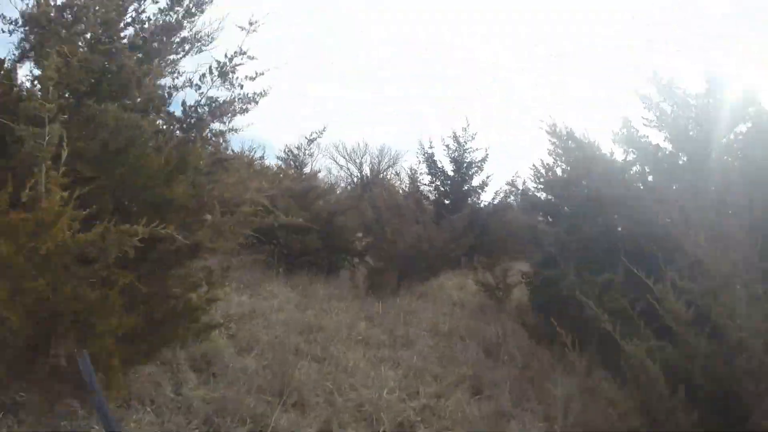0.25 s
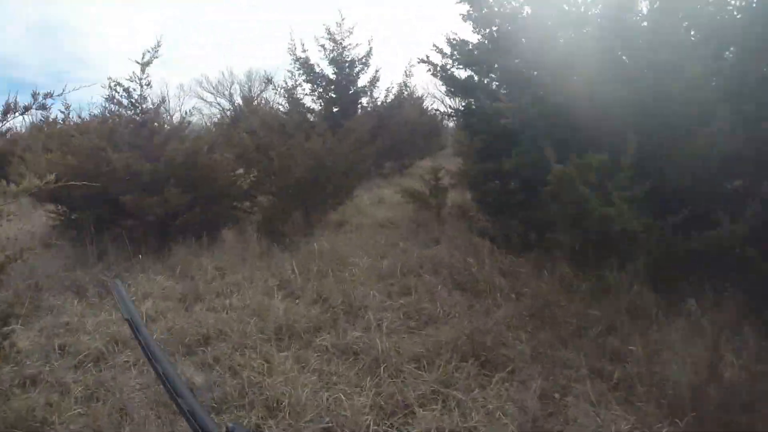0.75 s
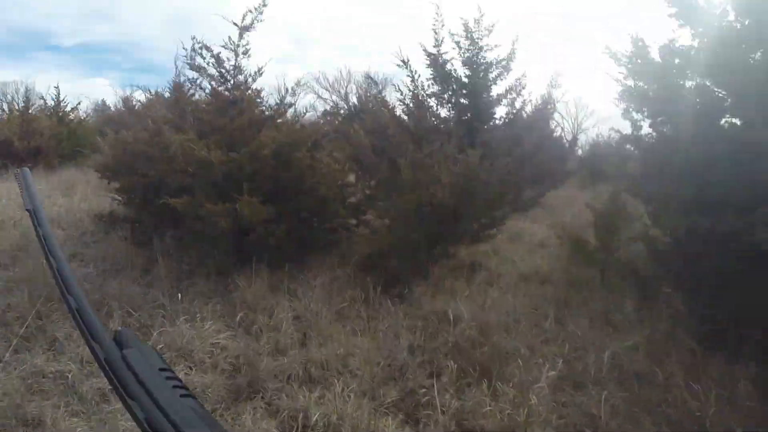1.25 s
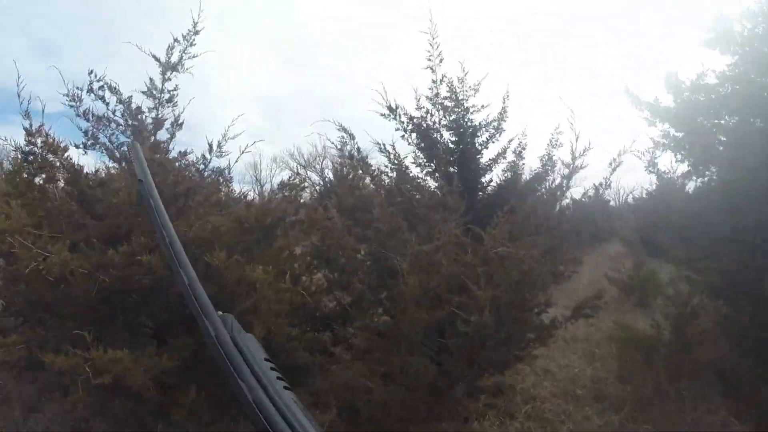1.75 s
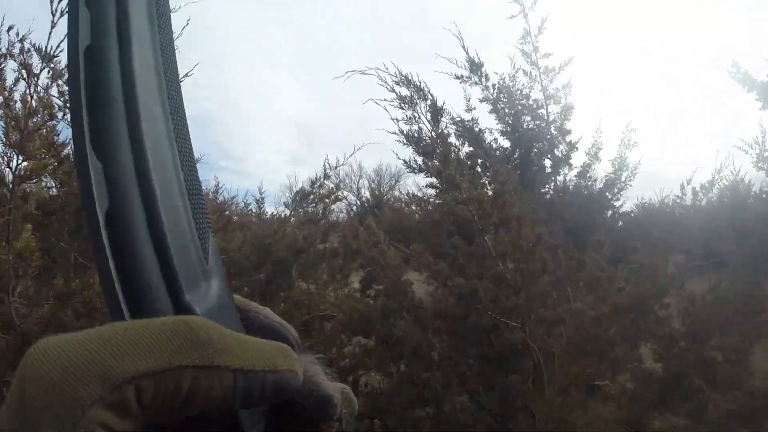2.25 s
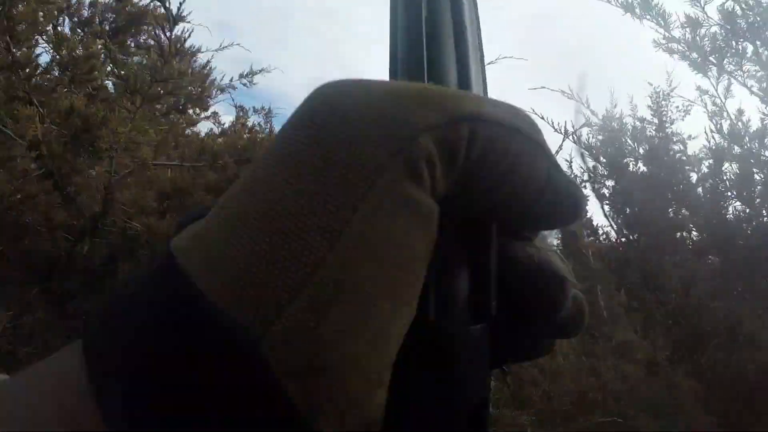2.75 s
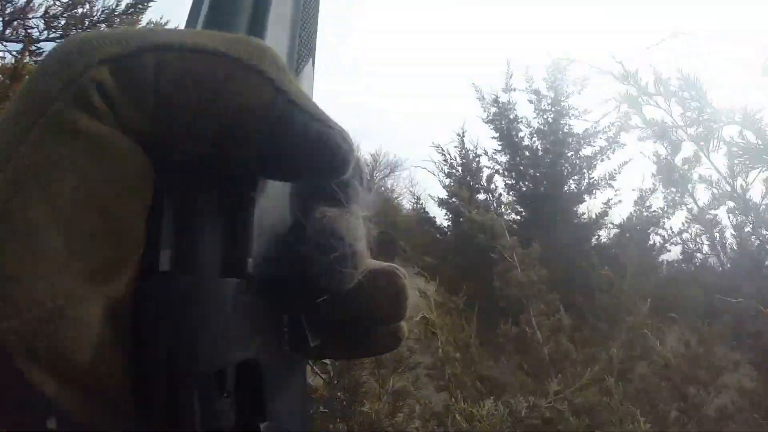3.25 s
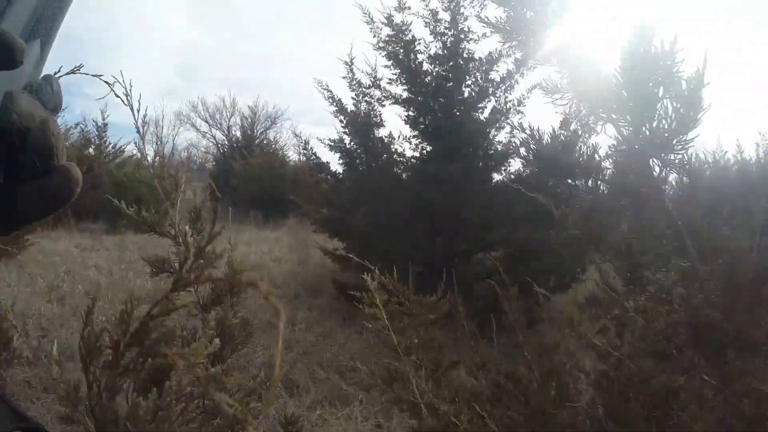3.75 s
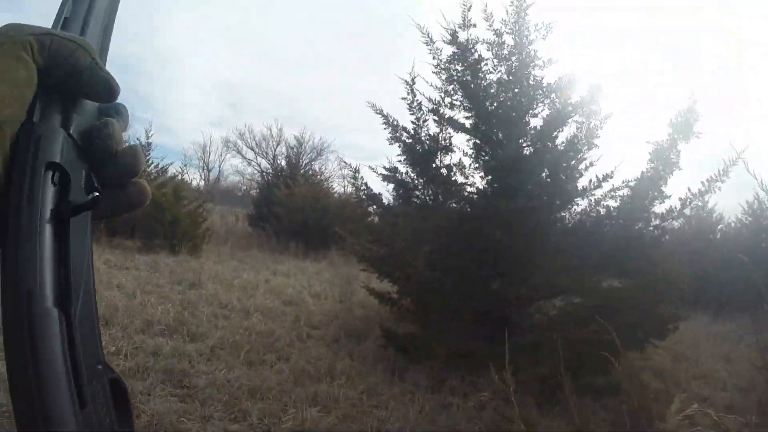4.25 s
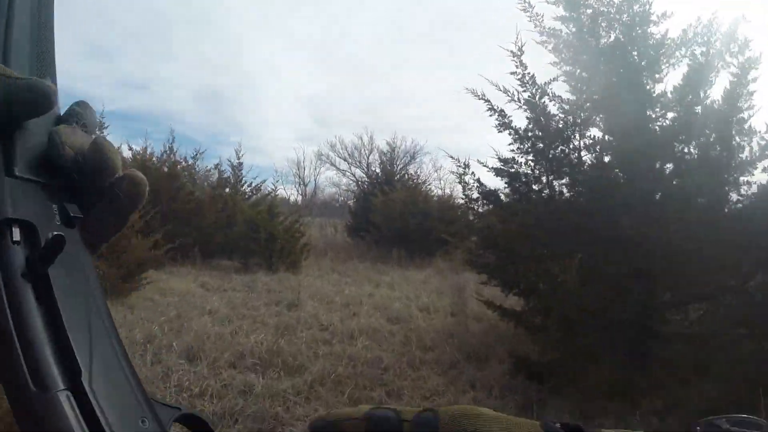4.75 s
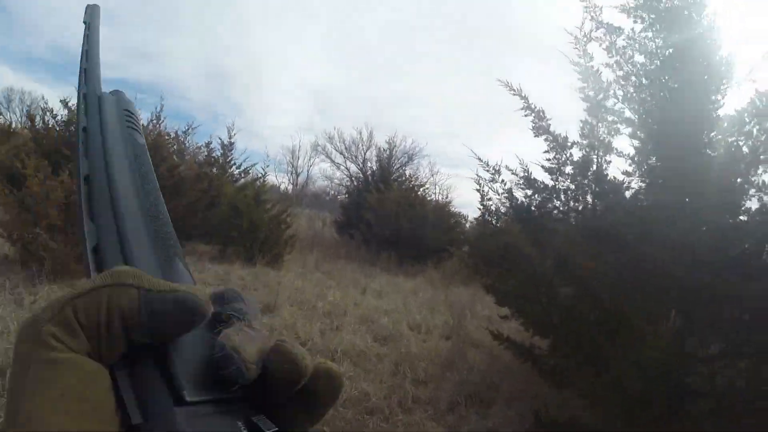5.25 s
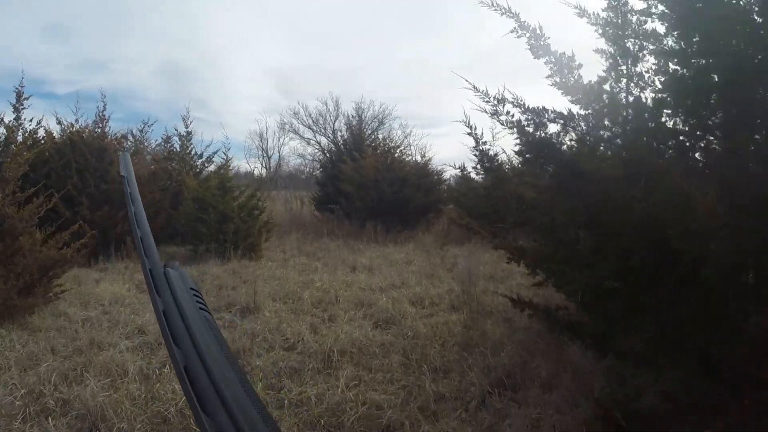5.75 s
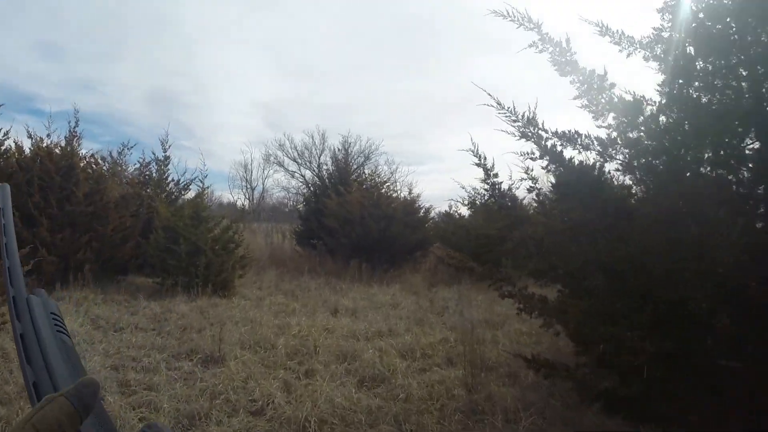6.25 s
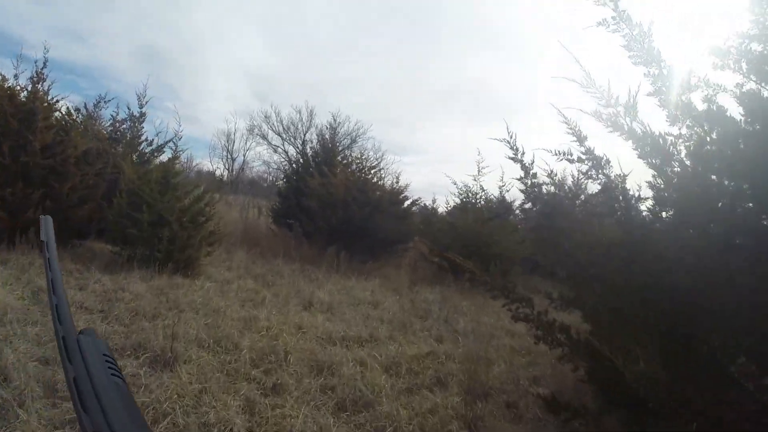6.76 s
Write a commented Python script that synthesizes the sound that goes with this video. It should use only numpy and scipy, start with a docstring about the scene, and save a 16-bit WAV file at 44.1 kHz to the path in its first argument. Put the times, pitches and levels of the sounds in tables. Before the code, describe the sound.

Low thumps, rumble and hollow clacks come with crunching footsteps in dry outdoor grass, picked up by a microphone inside a closed case worn on the body. The steps ease as evergreen boughs brush past and twigs crack. A metal fitting on a carried gun clinks sharply, then again a second later, with a short ring. Quiet, careful steps and light rustling follow over a faint hiss.

```python
"""Low jolts and hollow knocks over crunching dry grass and swishing cedar, heard through a closed case.
A walker with a long gun and a body-worn camera pushes through: steps jolt the mount, gear taps the case,
stalks snap and needles slide along clothing. Two sharp metal clinks from the gun's fittings make the
camera duck its gain, then the walk goes on softly."""
import sys
import numpy as np
from scipy import signal
from scipy.fft import rfft, irfft, next_fast_len
from scipy.io import wavfile

SR = 44100
rng = np.random.default_rng(int(sys.argv[2]) if len(sys.argv) > 2 else 0)


def put_to_file(sound):
    """Save the sound as 16-bit audio at rate SR, in the file named by the first command-line argument."""
    columns = np.atleast_2d(sound).T  # one column per channel
    safe = np.clip(columns, -1, 1)
    whole_steps = np.round(safe * 32767)
    wavfile.write(sys.argv[1], SR, whole_steps.astype(np.int16))


N = 309582
T = np.arange(N) / SR

# spectrum of stalk crunch and cloth drag: freq_hz, relative_db
CRUNCH_SPECTRUM = [(130, -25), (250, 3), (450, 1.5), (800, -6.5), (1350, -6), (2100, -11), (3200, -22),
                   (7000, -63.5)]
# long modes of the gun's fitting, first set: pitch_hz, relative_db, t60_s
FITTING_MODES = [(1814, 0, .245), (2902, -12, 0.11), (3138, -10, 0.083)]


def from_db(db):
    return 10 ** (np.asarray(db) / 20)


def unit_rms(x):
    return x / np.sqrt(np.mean(x ** 2) + 1e-20)


def power_sum(*gains):
    return np.sqrt(sum(gain ** 2 for gain in gains))


def at_hz(points, hz):
    """Interpolate a spectrum over log frequency."""
    known_hz, values = np.transpose(points)
    return np.interp(np.log(hz + 1e-3), np.log(known_hz), values)


def add(out, start_s, sound):
    start = max(round(start_s * SR), 0)
    out[start:start + len(sound)] += sound[:N - start]


def drift(rate_hz):
    """Slow random curve, rms 1."""
    hz = np.fft.rfftfreq(N, 1 / SR)
    return unit_rms(irfft(rfft(rng.standard_normal(N)) / (1 + (hz / rate_hz) ** 2), N))


def swell(middle_s, length_s):
    """Gaussian rise and fall, height 1."""
    return np.exp(-np.minimum(2 * ((T - middle_s) / length_s) ** 2, 50))


def coloured(x, spectrum):
    """Filter by a smooth spectrum; rms 1."""
    size = next_fast_len(N + SR // 10)
    gain = from_db(at_hz(spectrum, np.fft.rfftfreq(size, 1 / SR)))
    return unit_rms(irfft(rfft(x, size) * gain, size)[:N])


def ring(force, hz, t60_s):
    """One mode: a unit click starts a decaying sine of height 1."""
    radius, angle = from_db(-60 / (t60_s * SR)), 2 * np.pi * hz / SR
    return signal.lfilter([0, np.sin(angle)], [1, -2 * radius * np.cos(angle), radius ** 2], force + 1e-18)


def contact(t, chatter_s, chatter_gain):
    """Force of a touch and its dying chatter, rounded by the give of the surfaces."""
    force = rng.standard_normal(len(t)) * np.exp(-t / chatter_s)
    force = chatter_gain * force / np.linalg.norm(force)
    force[0] += 1
    return signal.sosfilt(signal.butter(2, 10500, fs=SR, output="sos"), force)


def struck(modes, force, hardness, detune):
    """A contact rings every mode; hardness (freq_hz, gain_db) weights them."""
    out = 0
    for k, (hz, mode_db, t60_s) in enumerate(modes):
        mode = ring(force, hz * np.exp(detune * rng.standard_normal()), t60_s)
        out += (-1) ** k * from_db(mode_db + at_hz(hardness, hz)) * mode / np.abs(mode).max()
    return out


def through_case(x):
    """The closed case resonates in a few bands; rms 1."""
    # main resonances, then thin whistling ones: centre_hz, width_hz, lift_db
    case_peaks = [(584, 79, 14), (1040, 82, 11), (2270, 620, 9.5), (3800, 620, 13.5), (6220, 890, 10.5)]
    case_whistles = [(5050, 140, 9), (10020, 380, 7), (12680, 230, 10)]
    for centre_hz, width_hz, lift_db in case_peaks + case_whistles:
        band = signal.lfilter(*signal.iirpeak(centre_hz, centre_hz / width_hz, fs=SR), x)
        x = x + (from_db(lift_db) - 1) * band
    return unit_rms(x)


def mic_hiss():
    """Steady hiss of the microphone in its case."""
    # noise floor: freq_hz, relative_db
    hiss_spectrum = [(2800, -20), (4200, 2), (5100, -0.5), (6200, -17), (10000, -13), (15000, -22)]
    return from_db(-64.5) * through_case(coloured(rng.standard_normal(N), hiss_spectrum))


def swell_envelopes():
    """Swells of swish and hiss: passing boughs, and two brief swishes at footsteps."""
    # swells: middle_s, length_s, swish_db, hiss_db
    swells = [(0.36, 0.15, -61, -62), (0.943, 0.019, -33.5, -52.5), (1.073, 0.17, -48, -57.5),
              (1.32, 0.024, -39, -58), (2.014, 0.095, -51, -56), (2.171, 0.053, -39.5, -61),
              (2.635, 0.14, -54, -58.5), (2.85, 0.19, -50.5, -66), (3.174, 0.066, -46, -72),
              (3.294, 0.34, -51.5, -59.5), (4.041, 0.17, -44.5, -61.5), (4.332, 0.23, -47.5, -68),
              (5.52, 0.14, -57, -64), (6.305, 0.26, -63, -65)]
    swish, hiss = np.zeros((2, N))
    for middle_s, length_s, swish_db, hiss_db in swells:
        touch = swell(middle_s, length_s)
        swish += from_db(swish_db) * touch
        hiss += from_db(hiss_db) * touch
    return swish, hiss


def twig_envelopes(decay_s=0.0089):
    """Dry twigs break in sudden bursts of crunch and bright ticks."""
    # breaks: start_s, crunch_db, tick_db
    twigs = [(0.426, -21, -73), (1.292, -25, -63), (1.912, -32.5, -59), (2.719, -33, -60),
             (2.82, -51, -46.5), (3.148, -57, -65), (3.556, -36, -51), (4.178, -32.5, -71),
             (4.949, -38.5, -51.5), (5.386, -33.5, -60), (5.513, -40, -67), (6.633, -39, -70)]
    crunch, tick = np.zeros((2, N))
    burst = np.exp(-T[:SR // 10] / decay_s)
    for start_s, crunch_db, tick_db in twigs:
        add(crunch, start_s, from_db(crunch_db) * burst)
        add(tick, start_s, from_db(tick_db) * burst)
    return crunch, tick


def step_envelopes(rise_s=0.05, fall_s=0.044, swing_lead_s=0.14):
    """The leg sweeps the grass, then weight on the foot crushes stalks and shakes the mount."""
    # footfalls: peak_s, crunch_db, shake_db
    steps = [(0.12, -27, -28.5), (0.345, -32.5, -29), (0.497, -29, -20), (0.888, -24.5, -22),
             (1.312, -30.5, -21), (1.512, -42, -53), (1.763, -29.5, -24), (2.262, -31.5, -30.5),
             (2.81, -39.5, -38.5), (4.536, -36.5, -41.5), (5.05, -43, -64), (5.401, -43.5, -54),
             (5.68, -49, -48.5), (5.81, -46.5, -60), (6.546, -43, -51.5)]
    crunch, shake = np.zeros((2, N))
    for peak_s, crunch_db, shake_db in steps:
        weight = np.exp(-np.maximum((peak_s - T) / rise_s, (T - peak_s) / fall_s))
        leg_swing = from_db(-12.5) * swell(peak_s - swing_lead_s, length_s=0.076)
        crunch += from_db(crunch_db) * (weight + leg_swing)
        shake += from_db(shake_db) * weight
    return crunch, shake


def walk_envelopes():
    """Effort, steps, swells and twigs set the strength of shake, crunch, swish and hiss."""
    # push through the grass, brisk then stalking: time_s, effort_db
    effort = [(0.01, -30), (0.7, -42.5), (1.7, -37), (1.95, -47), (2.45, -52), (3.3, -50), (3.8, -49.5),
              (4.9, -52), (5.75, -54), (6.2, -54.5), (7.01, -54.5)]
    effort_db = np.interp(T, *np.transpose(effort))
    push = from_db(effort_db)
    step_crunch, step_shake = step_envelopes()
    swell_swish, swell_hiss = swell_envelopes()
    twig_crunch, twig_tick = twig_envelopes()
    blade_hiss = from_db(-48.5 + 0.32 * effort_db)  # dry blades on cloth
    shake = power_sum(from_db(-3) * push, step_shake)
    crunch = power_sum(push, step_crunch, twig_crunch, from_db(-7) * swell_swish)
    swish = power_sum(from_db(-12.5) * push, from_db(-12.5) * step_crunch, swell_swish)
    hiss = power_sum(blade_hiss, from_db(-36.5) * step_crunch, swell_hiss, twig_tick)
    return shake, crunch, swish, hiss


def rustle(spectrum, snaps_per_s, spread_db, clump_db, friction_db):
    """Tiny uneven snaps come in clumps; sliding friction catches and lets go with them."""
    sizes = from_db(spread_db * np.minimum(rng.exponential(1, N), 4)) * rng.choice([-1, 1], N)
    clumps = from_db(clump_db * drift(rate_hz=45))
    snaps = unit_rms(sizes * clumps * (rng.random(N) < snaps_per_s / SR))
    friction = from_db(friction_db) * np.sqrt(clumps) * rng.standard_normal(N)
    return through_case(coloured(snaps + friction, spectrum))


def vegetation(crunch, swish, hiss):
    """Stalks break one by one, grass and boughs slide almost smoothly, needles hiss with sparse ticks."""
    # sliding foliage and needles: freq_hz, relative_db
    swish_spectrum = [(900, -13), (1700, -5.5), (2350, 7.5), (2950, -8.5), (3900, -7), (8000, -29.5)]
    needle_spectrum = [(3000, -8.5), (5000, -11), (6500, -10), (8500, -10), (11500, -12.5), (15000, -23.5)]
    stalks = rustle(CRUNCH_SPECTRUM, snaps_per_s=800, spread_db=2.5, clump_db=3.4, friction_db=-0.5)
    foliage = rustle(swish_spectrum, snaps_per_s=2200, spread_db=3.2, clump_db=2.3, friction_db=0.5)
    needles = rustle(needle_spectrum, snaps_per_s=90, spread_db=-5.5, clump_db=3, friction_db=9)
    return from_db(-0.5) * crunch * stalks + from_db(-1) * swish * foliage + from_db(2) * hiss * needles


def mount_rumble(shake):
    """The shaking camera mount rumbles unevenly."""
    # rumble: freq_hz, relative_db
    rumble_spectrum = [(25, 3.5), (110, -3.5), (170, -6), (260, -19), (450, -33.5), (1000, -76)]
    lumps = from_db(2 * drift(rate_hz=20))
    return from_db(7.5) * shake * coloured(rng.standard_normal(N) * lumps, rumble_spectrum)


def mount_jolts():
    """A jolt swings the mount through a few deep cycles and drags cloth across the case."""
    # jolts: start_s, envelope_peak_db, pitch_hz, rise_s
    jolts = [(.025, -5.5, 130, 0.0045), (0.052, -1, 70.4, 0.001), (0.149, -5, 49.5, 0.002),
             (.205, -11.5, 108, 0.0052), (0.337, -3, 112, 0.0051), (0.47, -14.5, 96.5, 0.026),
             (0.873, -13.5, 250, 0.0038), (0.906, -9.5, 122, 0.0065), (1.292, -8.5, 55, 0.0072),
             (1.312, -7, 118.4, 0.0077), (1.485, -7.5, 90, 0.0044), (1.709, -20, 77, 0.01),
             (1.751, -15.5, 70.5, 0.013), (2.238, -22, 128, 0.0053), (2.287, -20, 107, 0.006),
             (3.465, -13, 78, 0.003), (4.569, -14.5, 240, 0.0036), (5.698, -35, 38.7, 0.02),
             (5.988, -33.5, 48.8, 0.0088)]
    swing, drag = np.zeros((2, N))
    t = T[:SR // 5]
    for start_s, peak_db, pitch_hz, rise_s in jolts:
        push = from_db(peak_db) * t / rise_s * np.exp(1 - t / rise_s)
        add(swing, start_s, push * np.sin(2 * np.pi * pitch_hz * t))
        add(drag, start_s, push)
    return swing + from_db(-19.5) * drag * coloured(rng.standard_normal(N), CRUNCH_SPECTRUM)


def gear_knocks():
    """Gear taps the case, differently each time, and faintly rings the gun's fitting."""
    # taps: start_s, thud_db, clack_db, crack_db
    knocks = [(0.041, -27, -17.5, -36), (0.1156, -38, -22.5, -33), (0.1271, -28, -14.5, -24),
              (0.167, -28.5, -22.5, -37.5), (0.4007, -33, -20.5, -46), (0.544, -14, -8.5, -24.5),
              (0.615, -36, -29.5, -52), (0.854, -22.5, -15, -36), (0.8735, -22.5, -14, -21.5),
              (0.884, -31, -23, -40), (1.0133, -28, -31.5, -51), (1.36, -45, -26, -22),
              (1.4883, -29, -23.5, -34.5), (1.4985, -26.5, -21, -36), (1.5165, -23, -27.5, -38),
              (1.5918, -30, -33, -27), (1.6606, -36, -26.5, -45), (1.74, -31.5, -15, -21),
              (1.8054, -30.5, -25, -33.5), (1.9448, -36, -45, -73), (2.301, -46, -19.5, -34.5),
              (2.9546, -38.5, -36, -69), (3.5915, -31, -23.5, -34.5), (4.3224, -37.5, -41, -64),
              (4.5063, -34, -45, -48), (4.5271, -29.5, -29.5, -52), (4.62, -29, -31.5, -50),
              (4.648, -27.5, -28, -48), (5.6374, -37.5, -44.5, -58), (6.008, -61, -45.5, -65)]
    # struck case: pitch_hz, relative_db, t60_s
    case_modes = [(308, -11.5, 0.022), (562.3, 10, 0.04), (693, 5.5, 0.016), (1050, 1, 0.035),
                  (1287, 2.5, 0.022), (1419, 2, .016), (1626, -1, .013), (2033, 1, 0.025),
                  (2367, -2, 0.022), (2657, -2.5, 0.035), (3365, 9, 0.013), (4025, 2.5, 0.013),
                  (5450, -1.5, 0.0054), (10400, -15.5, 0.0015)]
    out, t = np.zeros(N), T[:SR // 4]
    fitting = sum(from_db(db) * ring(t == 0, hz, t60_s) for hz, db, t60_s in FITTING_MODES)
    for start_s, thud_db, clack_db, crack_db in knocks:
        top_db = crack_db + (crack_db - clack_db)  # hard taps stay bright, soft ones fall away
        hardness = [(650, thud_db), (1050, clack_db), (2400, clack_db), (3400, crack_db), (9000, top_db)]
        force = contact(t, chatter_s=0.0028, chatter_gain=0.98)
        add(out, start_s, struck(case_modes, force, hardness, detune=0.017))
        add(out, start_s, from_db(clack_db - 22.5) * fitting)
    return out


def metal_clinks(rattle_db=-38.5, rattle_decay_s=0.01):
    """Metal hits metal in three quick touches; the loose fitting rattles and rings on."""
    # clinks: start_s, touch_gap_s, snap_peak_db, body_db, sparkle_db, first_ring_db, second_ring_db
    clinks = [(3.464, 0.00065, 10.3, -7.5, -7.5, -23.5, -14), (4.5679, 0.0016, 12.26, -11, 3, -7, -15.5)]
    # force of each touch: relative_db
    touches_db = [-3, 0, -4]
    # fitting's short modes and second set of long modes: pitch_hz, relative_db, t60_s
    snap_modes = [(535, -6.5, 0.018), (1250, 1, 0.011), (2020, 0.5, 0.015), (2320, 5.5, 0.017),
                  (2800, 1, 0.011), (3867, 1.5, 0.0066), (4430, -6, .012), (4850, -5, .006),
                  (6960, -7.5, 0.0038), (10700, -7.5, 0.00062)]
    second_modes = [(2180, -2, 0.19), (2422, -7.5, 0.06)]
    out, t = np.zeros(N), T[:SR // 2]
    for start_s, gap_s, snap_peak_db, body_db, sparkle_db, first_ring_db, second_ring_db in clinks:
        force = from_db(rattle_db) * rng.standard_normal(len(t)) * np.exp(-t / rattle_decay_s)
        for k, touch_db in enumerate(touches_db):
            touch = contact(t[:SR // 50], chatter_s=0.0004, chatter_gain=1)
            add(force, k * gap_s, from_db(touch_db) * touch)
        hardness = [(1100, body_db), (2000, 0), (3000, 0), (7000, sparkle_db)]
        snap = struck(snap_modes, force, hardness, detune=0)
        add(out, start_s, from_db(snap_peak_db) * snap / np.abs(snap).max())
        for modes, ring_db in ((FITTING_MODES, first_ring_db), (second_modes, second_ring_db)):
            for hz, mode_db, t60_s in modes:
                add(out, start_s, from_db(ring_db + mode_db) * ring(t == 0, hz, t60_s))
    return out


def gain_control(x, attack_s=0.0032, look_ahead_s=0.0015, recovery_db_per_s=12):
    """The camera cuts gain just ahead of a peak over full scale, then recovers steadily."""
    over_db = np.maximum(20 * np.log10(np.abs(x[0]) + 1e-9), 0)
    recovery_db = recovery_db_per_s * T
    cut_db = np.maximum.accumulate(over_db + recovery_db) - recovery_db
    pole = np.exp(-1 / (attack_s * SR))
    smooth_cut_db = signal.lfilter([1 - pole], [1, -pole], cut_db)
    return x * from_db(-np.interp(T + look_ahead_s, T, smooth_cut_db))


def scene():
    """Rumble and vegetation follow the walk; jolts, knocks and clinks sit on top. Mono."""
    shake, crunch, swish, hiss = walk_envelopes()
    bed = mount_rumble(shake) + vegetation(crunch, swish, hiss) + mic_hiss()
    return (bed + mount_jolts() + gear_knocks() + metal_clinks())[None]


def record(dry):
    """Camera chain: gain ducking, soft overload on the first instants of peaks, steep low-pass."""
    ducked = gain_control(dry)
    overloaded = ducked / (1 + ducked ** 8) ** (1 / 8)
    cutoff_hz = 15600
    return signal.sosfilt(signal.ellip(10, 0.2, 80, cutoff_hz, fs=SR, output="sos"), 0.93 * overloaded)


dry = scene()
out = record(dry)
put_to_file(out)
```